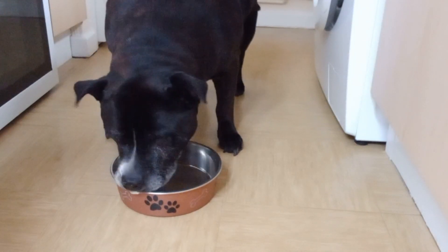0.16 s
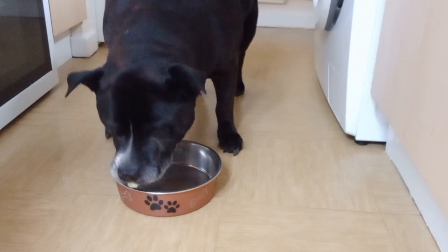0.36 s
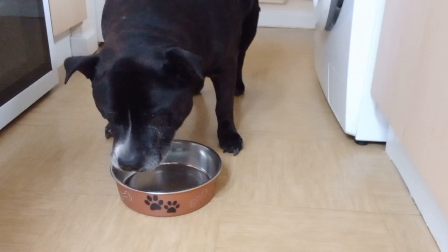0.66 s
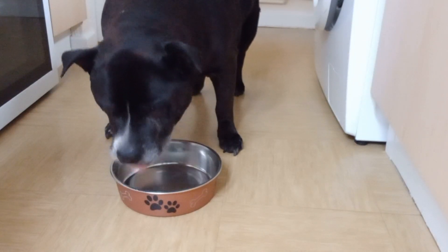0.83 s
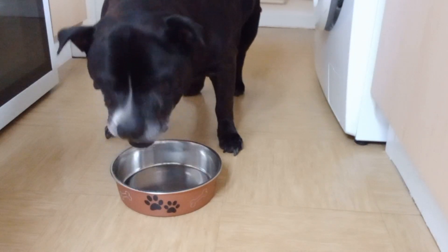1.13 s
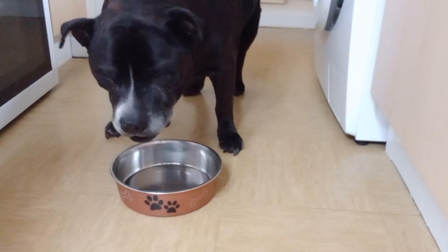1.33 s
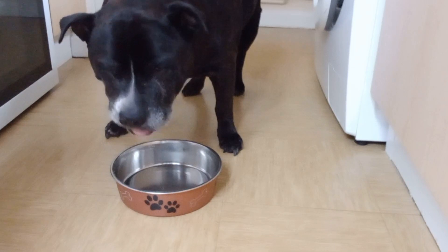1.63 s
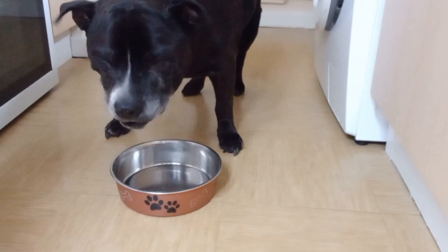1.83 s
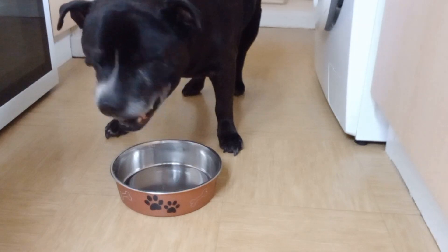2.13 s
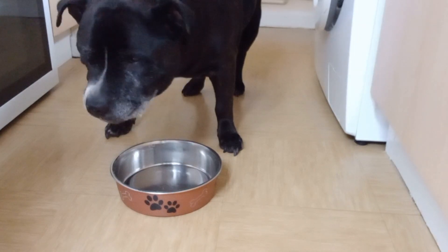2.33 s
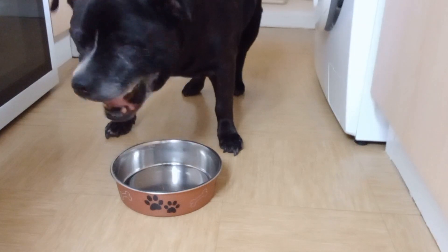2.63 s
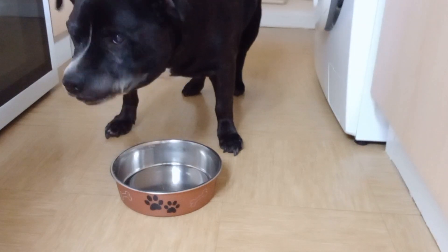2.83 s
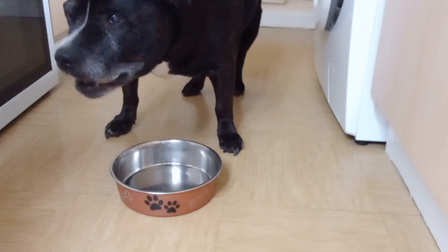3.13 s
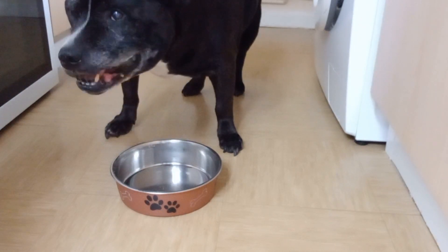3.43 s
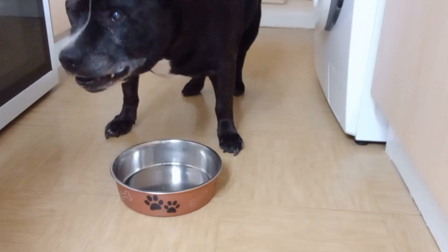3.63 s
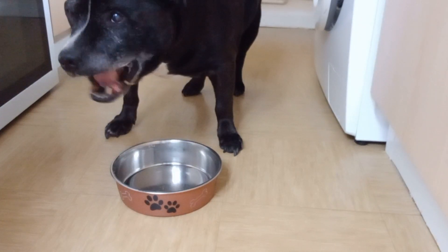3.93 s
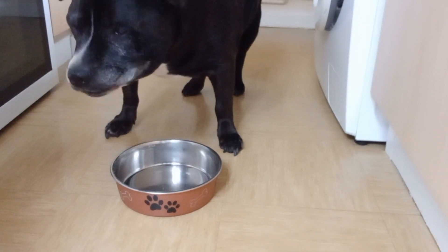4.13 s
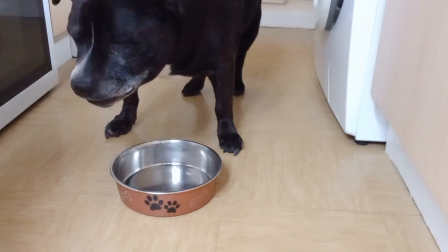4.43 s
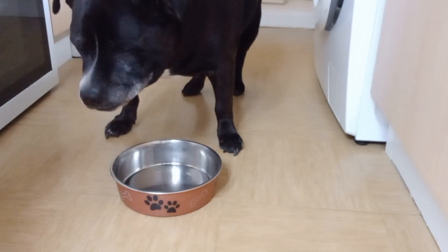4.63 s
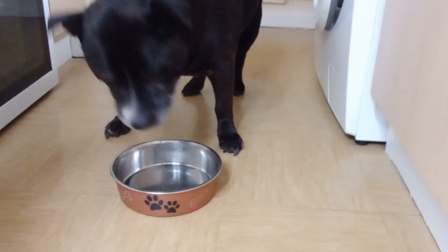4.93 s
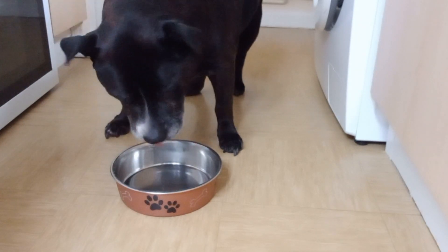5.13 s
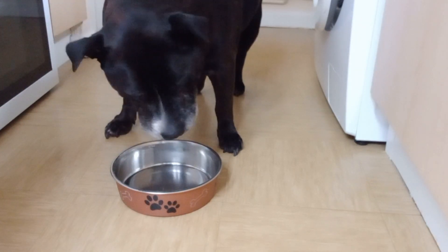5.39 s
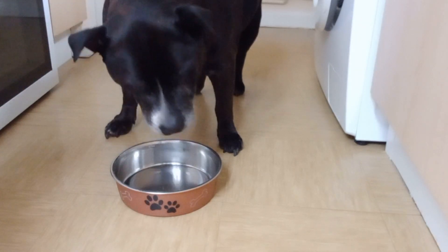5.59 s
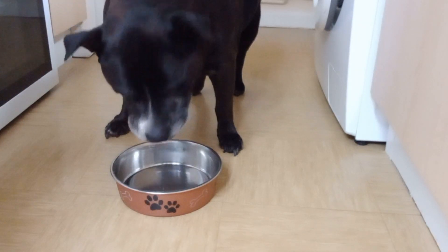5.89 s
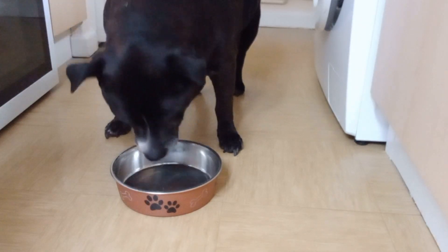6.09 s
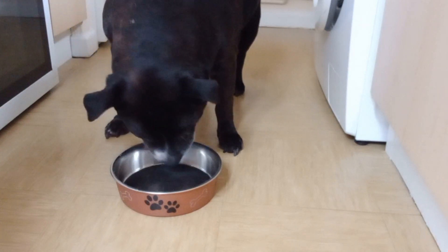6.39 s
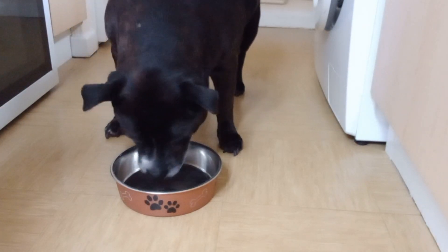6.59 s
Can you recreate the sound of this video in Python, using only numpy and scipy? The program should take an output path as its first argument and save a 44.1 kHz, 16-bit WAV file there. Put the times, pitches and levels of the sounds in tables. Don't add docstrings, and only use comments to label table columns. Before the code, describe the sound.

A dog licks and chews wetly over a metal bowl in a small hard kitchen, smacking irregularly, with a few dull floor thumps.

```python
import sys
import numpy as np
from scipy import signal
from scipy.fft import rfft, irfft
from scipy.io import wavfile
from scipy.ndimage import uniform_filter1d

SR = 44100
rng = np.random.default_rng(int(sys.argv[2]) if len(sys.argv) > 2 else 0)


def undo_db(level):
    steps = np.asarray(level, float) / 20
    return 10 ** steps


def wav_record(signal):
    frames = np.transpose(np.atleast_2d(signal))
    bounded = np.clip(frames, -1, 1)
    quanta = np.round(bounded * 32767).astype(np.int16)
    wavfile.write(sys.argv[1], SR, quanta)


N = 297675

# (time [s], peak [dB], cavity [Hz], ring [cycles])
TONGUE_SMACKS = [(0.536, -34.5, 630, 5), (0.583, -26, 740, 4.3), (0.887, -30.5, 676, 6.2),
                 (1.187, -28, 1150, 4.2), (1.86, -20, 1320, 3.8), (1.928, -22, 1340, 1.9),
                 (2.103, -24.5, 1210, 6), (2.147, -13, 1180, 1.06), (2.405, -29.5, 635, 2.9),
                 (2.622, -32, 1070, 4.3), (3.006, -24, 1160, 3.3), (3.025, -27.5, 1200, 4.5),
                 (3.425, -15, 1080, 2.5), (3.525, -26, 1250, 4.2), (3.617, -23.5, 1190, 10),
                 (3.633, -13, 930, 2.65), (3.735, -20.5, 900, 1.1), (3.854, -15.5, 1237, 1.3),
                 (3.878, -15, 1120, 1.1), (4.04, -22, 1080, 2), (4.063, -27.5, 772, 11),
                 (4.866, -13, 1170, 2.5), (5.285, -24.5, 1570, 11), (5.719, -19.5, 1042, 11.3),
                 (5.805, -41, 1150, 1.8), (5.893, -26, 685, 4.7), (6.146, -16.5, 1360, 2.5),
                 (6.207, -18.5, 1310, 1.1), (6.249, -13.5, 745, 1.84), (6.335, -22, 770, 1.1)]
# (time [s], peak [dB], cavity [Hz], ring [cycles])
MORE_SMACKS = [(2.502, -46, 1200, 2.3), (2.606, -27, 2000, 4), (2.639, -26.5, 1260, 2.8),
               (2.956, -31, 1090, 2), (2.98, -26.5, 985, 5), (3.115, -33, 984, 7.9), (3.21, -46, 910, 5.4),
               (3.228, -39, 1400, 3.2), (3.414, -26, 1080, 3.7), (3.441, -24, 1050, 3.4),
               (3.646, -26, 864, 2.7), (3.668, -25, 950, 2.8), (3.703, -18, 1170, 2.3),
               (3.707, -25.5, 2600, 5.5), (3.888, -40, 2080, 3.4), (3.946, -28, 1266, 5.1),
               (4.007, -22.5, 1170, 1.3), (4.097, -30, 890, 3.4), (4.085, -28.5, 2470, 4.6),
               (4.432, -31, 2650, 5.6), (4.455, -24, 1230, 3), (4.557, -32.5, 1120, 5.1),
               (4.853, -14.5, 2650, 3.4), (4.885, -24.5, 980, 6.9), (5.261, -39, 1700, 3.3),
               (5.308, -22, 1900, 4.7), (5.327, -19.5, 2150, 2.2), (5.731, -20, 1120, 6.4),
               (5.973, -23.5, 1800, 4.3), (6.103, -28, 1910, 4), (6.255, -19, 1120, 1.6),
               (6.308, -32, 744, 2.6), (1.736, -39.5, 1050, 3.9), (1.989, -39, 2300, 1.8),
               (2.196, -39, 1900, 2.5), (3.436, -20.5, 1170, 1.8), (3.451, -25, 1720, 3),
               (5.745, -23, 2000, 4), (3.522, -32, 3060, 4.5), (6.149, -29, 1500, 3), (2.161, -27, 2130, 2.5),
               (1.893, -24, 1280, 2.5), (1.962, -33, 2370, 4), (4.469, -24, 4350, 8), (1.662, -41, 4800, 8),
               (1.338, -42, 1900, 1.5)]
# (time [s], peak [dB], cavity [Hz])
LIP_SMACKS = [(1.187, -30, 2000), (1.339, -43, 1830), (1.708, -40, 2010), (1.824, -38, 1790),
              (1.861, -22, 1910), (1.929, -25, 2290), (2.065, -38, 2400), (2.147, -21, 1850),
              (2.256, -26.5, 2530), (2.406, -33, 2720), (2.999, -37.5, 2600), (3.115, -35.5, 1350),
              (3.428, -29, 2220), (3.525, -36, 2200), (3.6188, -25, 2340), (3.634, -41, 2440),
              (3.736, -32, 2100), (3.878, -26.5, 2170), (4.33, -36, 1480), (4.435, -33.5, 2770),
              (4.801, -34.5, 2180), (4.851, -25, 1710), (5.207, -40, 1500), (5.261, -49, 1658),
              (5.286, -21.5, 2180), (5.623, -27.5, 2130), (5.719, -23, 2250), (5.805, -30, 2160),
              (5.904, -30, 3020)]
LIP_CYCLES = 1.99
LEAD_S, LEAD_DB, LEAD_PITCH = 0.003993, -14.5, 1.071

# (full force from [s], held [s], squelch [dB], mouth cavity [Hz], fizz [dB rel])
CHEWS = [(0.0, 0.0037, -32.5, 1670, 0.5), (0.598, 0.0058, -43.5, 760, -2.5), (.28, 0.037, -50, 680, 1.5),
         (1.179, 0.09, -41.5, 1850, 0), (1.74, 0.042, -45.5, 1710, -17), (1.871, 0.065, -33, 1860, -1.5),
         (2.11, 0.046, -27, 1120, -28), (2.155, 0.024, -27.5, 1580, -5), (2.31, 0.19, -40.5, 1500, -5),
         (2.595, 0.039, -46, 1840, 3), (2.969, 0.085, -38, 1260, -5.5), (3.196, 0.045, -34.5, 1310, 0.5),
         (3.43, 0.014, -33, 1380, -27), (3.639, 0.15, -31, 1350, -5), (3.87, 0.12, -34.5, 1220, -6),
         (4.072, 0.025, -45.5, 1130, 9), (4.36, 0.089, -35, 1100, -6.5), (4.459, 0.01, -33.5, 1150, -19),
         (4.87, 0.084, -34.5, 1180, -8), (5.266, 0.0069, -29, 1780, -11), (5.64, 0.025, -39, 2040, 2),
         (5.73, 0.18, -33.5, 1230, -16), (5.95, 0.28, -43, 1500, 2), (6.74, .03, -52, 1710, -4)]
BITE_DB_PER_S, EASE_DB_PER_S, FIZZ_EASE_DB_PER_S = 303, 192, 133
REST_DB, REST_HZ, REST_FIZZ_DB = -72, 1500, -106
FRONT_HZ, FRONT_DB, DIP_HZ, DIP_SHARE = 2600, -20, 1850, 0.2
# (frequency [Hz], level [dB per Hz])
FIZZ_COLOUR = [(1470, -3), (2500, 6), (3410, 0.5), (4410, 1.5), (5070, 1), (7770, 2.5), (8200, -1),
               (9080, -29), (14600, -35), (16000, -36)]
SPLIT_HZ = 8850

# (time [s], peak [dB], colour [Hz], spray [dB rel])
THREAD_CRACKS = [(0.468, -38, 6860, -7.5), (2.687, -42.5, 8300, -2), (0.9472, -40.5, 7600, -8.5),
                 (1.1867, -27.5, 5350, -6.5), (1.338, -37, 8400, -10), (1.729, -33, 6560, 2),
                 (1.8612, -39, 3970, 0.5), (2.109, -30, 7200, -16), (2.135, -28.5, 4560, -13),
                 (2.2567, -26.5, 5600, -17), (2.996, -37, 4700, -13), (3.411, -39, 3320, -9),
                 (3.426, -29, 4800, -12), (3.52, -32.5, 2960, -5), (3.6166, -35, 3080, -8),
                 (3.7008, -31.5, 5460, -9), (3.8786, -26, 3500, -9), (3.964, -41.5, 8100, 7),
                 (4.323, -34, 7950, -12.5), (4.424, -30.5, 7400, -6), (4.446, -30, 4240, -6),
                 (4.828, -32.5, 4270, -9.5), (4.8527, -32, 3140, -13), (4.867, -28.5, 2800, -11),
                 (5.539, -43.5, 7750, -18), (5.6213, -28.5, 6500, -8), (5.7177, -33, 3400, -17),
                 (6.064, -28.5, 5900, -8), (6.146, -30.5, 3020, -24), (6.7148, -45, 7600, -10)]
# (time [s], peak [dB], colour [Hz])
FOOD_CRUNCHES = [(0.596, -42, 7550), (0.773, -41, 7540), (1.064, -42, 8500), (1.169, -27, 8200),
                 (1.621, -50, 7800), (2.0627, -38, 3150), (2.2902, -37, 5600), (2.4028, -31, 3330),
                 (2.452, -33, 4430), (2.5662, -29.5, 7000), (2.659, -41, 4600), (2.887, -37.5, 2730),
                 (3.192, -30, 5740), (3.631, -24.5, 9100), (4.001, -33.5, 3300), (4.466, -27, 4140),
                 (4.554, -36, 4400), (4.744, -36, 3920), (4.803, -33, 3100), (4.912, -35, 6360),
                 (5.121, -42.5, 5860), (5.202, -36, 6000), (5.247, -33, 6340), (5.282, -33, 3400),
                 (5.803, -31, 3820), (5.852, -34, 3740), (5.959, -26.5, 3280), (5.961, -31.5, 6000),
                 (6.01, -33.5, 3470), (6.163, -28, 2920), (6.483, -60, 4500)]
# (time [s], peak [dB], colour [Hz])
LIP_TICKS = [(1.0214, -34.5, 7960), (1.1532, -35, 8300), (1.6834, -57, 4530), (1.703, -29.5, 8140),
             (1.738, -35, 7200), (1.987, -37, 3840), (2.195, -37, 7100), (2.4107, -39, 3030),
             (2.591, -22, 4570), (2.606, -24.5, 5480), (2.627, -28, 3060), (2.9693, -36, 3530),
             (3.679, -36, 5610), (3.764, -26, 3200), (3.8925, -19.5, 7200), (3.911, -28, 3080),
             (3.93, -27, 7760), (4.1167, -24.5, 5000), (4.4725, -36, 4570), (4.6002, -28.5, 4740),
             (4.9694, -28.5, 3030), (5.9438, -29, 3450), (6.0127, -33, 3080), (6.0743, -25.5, 7100),
             (6.2078, -30, 3120), (6.2463, -29, 3930), (6.736, -37, 5180), (1.045, -45, 3000),
             (1.093, -36.5, 3600), (1.855, -39, 6300), (2.066, -34, 6000), (3.424, -22.5, 7000),
             (3.437, -25, 5000), (3.496, -45, 3000), (3.559, -36, 3800), (3.527, -40, 6500),
             (5.245, -23, 4420), (5.263, -28, 3200), (6.014, -22.5, 5300), (6.068, -26, 3350),
             (6.53, -60, 7600), (6.386, -38, 6500), (6.335, -28, 3370), (5.648, -30, 4000)]
CRUNCH_SPRAY_DB, CRUNCH_WIDE = -26, 0.7
TICK_SPRAY_DB, TICK_WIDE = -24, 0.48
SNAP_S, SNAP_PEAK = 0.0006, 6.65
SPLASH_S, SPLASH_DB = 0.006, -10.5
SPRAY_S = 0.0021
TINT_WIDTH, TINT = 0.22, 1.05

# (time [s], length [s], level [dB], first pitch [Hz], last pitch [Hz])
SLURPED_AIR = [(0.214, 0.35, -66.5, 3600, 3000), (0.236, 0.18, -58, 1500, 1170),
               (0.245, 0.15, -63, 3020, 3000), (0.7, 0.063, -65, 2880, 2800),
               (0.875, 0.073, -59, 1900, 2000), (0.948, 0.086, -65, 2290, 2450),
               (1.048, 0.064, -61, 1500, 1380), (5.897, 0.092, -53, 2970, 3400),
               (1.2, 0.068, -67, 1566, 1500), (1.643, 0.024, -49.5, 4770, 5100),
               (1.713, 0.096, -54.5, 2370, 2300), (1.722, 0.042, -51, 690, 1274),
               (2.36, 0.1, -53.5, 2940, 2800), (2.494, 0.12, -46.5, 1000, 2300),
               (2.584, 0.052, -46.5, 4450, 2840), (2.78, 0.091, -55, 6130, 5200),
               (2.796, 0.13, -54, 1130, 1430), (2.804, 0.049, -53.5, 2750, 2400),
               (2.83, 0.1, -58, 4130, 4200), (3.009, 0.04, -43, 2280, 2120),
               (3.176, 0.098, -41.5, 2720, 2480), (3.304, 0.0092, -48, 620, 627),
               (3.404, 0.042, -38, 1070, 1070), (3.991, 0.25, -49, 945, 580),
               (4.09, 0.063, -54.5, 2640, 2500), (4.442, 0.061, -39, 4300, 4400),
               (4.533, 0.19, -58.5, 4470, 4400), (5.62, 0.027, -49, 2750, 2800),
               (1.86, 0.06, -56, 4300, 4200), (1.94, 0.068, -48, 3740, 3640),
               (4.548, 0.041, -50.5, 950, 1090), (4.7, 0.099, -53.5, 1200, 1760),
               (4.971, 0.048, -48, 5600, 5400), (5.521, 0.053, -62, 2590, 2600),
               (5.857, 0.06, -49, 3600, 3800), (6.098, 0.043, -48, 1340, 1300),
               (6.264, 0.12, -43.5, 1280, 840), (6.317, 0.086, -53.5, 3420, 3600),
               (6.477, 0.065, -62.5, 2140, 2190), (6.735, 0.042, -39, 5400, 6000)]
SLURP_WIDTH = 0.16
# (time [s], length [s], level [dB], pitch [Hz])
THROAT_GULPS = [(0, 0.059, -45, 696), (0.286, 0.096, -61.5, 594), (1.016, 0.067, -61, 423),
                (2.133, 0.048, -51.5, 403), (2.357, 0.15, -52, 447), (2.877, 0.021, -50, 700),
                (3.038, 0.054, -58, 290), (3.236, 0.091, -49, 686), (3.629, 0.091, -58.5, 199),
                (3.77, 0.09, -47, 387), (4.101, 0.051, -53, 583), (4.603, 0.19, -68, 226),
                (4.85, 0.042, -54, 423), (4.931, 0.1, -46.5, 427), (5.618, 0.058, -59, 470),
                (5.625, 0.04, -46, 710), (5.834, 0.39, -51.5, 380), (6.01, 0.097, -50.5, 637)]
GULP_SAG, GULP_WIDTH_HZ = 0.79, 118
# (time [s], length [s], level [dB], first pitch [Hz], last pitch [Hz])
MOUTH_HUMS = [
    (0.132, 0.046, -52.5, 730, 690),
    (0.466, 0.11, -50.5, 616, 626),
    (0.591, 0.1, -52, 816, 800),
    (0.69, 0.042, -64, 815, 820),
    (0.879, 0.059, -50.5, 700, 680),
    (1.954, 0.14, -45.5, 617, 670),
    (3.577, 0.035, -49, 1160, 1270),
    (5.392, 0.034, -49.5, 706, 673),
    (5.721, 0.078, -46.5, 1110, 1095),
]
HUM_WIDTH_HZ = 35

# (time [s], peak [dB], lowest board [dB rel], higher boards [dB rel])
FLOOR_THUMPS = [(1.315, -33.5, 7, -15), (2.14, -44.5, -3, 4), (2.407, -39, -3, -17), (3.054, -38, 0.5, -8),
                (3.244, -26.5, -5, -17), (3.296, -33, -3, -5), (3.424, -40.5, 12, -6),
                (3.787, -9.5, -14, -17), (3.817, -10.5, -12, -9), (3.834, -15, -10, 0.5),
                (3.862, -20.5, 9, -15), (3.889, -16.5, 1, -8.5), (4.088, -22.5, -8, -21),
                (4.12, -28, 7.5, -3.5), (4.943, -13.5, -2, -17), (4.964, -19.5, 10, -4),
                (5.886, -35.5, -3, -3.5), (6.119, -30, -3, -8), (6.157, -26.5, -3, -9.5),
                (6.337, -15, -7, -15.5), (6.718, -30.5, -3, -7)]
# (pitch [Hz], level [dB], time to fall 60 dB [s])
FLOOR_BOARDS = [
    (91, -0.5, 0.16),
    (136, 7.5, 0.2),
    (169.7, 10, 0.17),
    (205, 12.5, 0.15),
]
HIGH_BOARDS_DB, HIGH_LAG_S = -2, 0.00073
HOLD_S, SHUT_DB = 0.139, -5.5

# (frequency [Hz], time to fall 60 dB [s])
ROOM_DECAY = [(300, 0.41), (1000, 0.35), (3000, 0.43), (8000, 0.39), (15000, 0.5)]
# (delay [ms], left level [dB], right level [dB])
EARLY_ECHOES = [
    (3.683, -2, -62),
    (11.775, -17.5, -3),
    (21.966, -5.5, -14),
]
# (time [s], left-right difference [dB])
HEAD_SWING = [
    (0.0, 2.5),
    (5.45, 2),
    (6.75, 1.5),
]
# (frequency [Hz], level [dB per Hz])
HUSH_COLOUR = [(15, -41), (25, -39), (38, -14), (72, 4), (123, 7), (394, -2.5), (818, -5.5), (1100, -11.5),
               (1330, -8.5), (1560, -11), (3520, -12.5), (7710, -7), (9320, -25.5), (14800, -18),
               (16000, -13.5)]
HUSH_DB = -51.5


def evened(x):
    return x / np.sqrt(np.mean(x ** 2) + 1e-20)


def read(points, hz):
    f, value = np.transpose(points)
    return np.interp(np.log(hz + 1), np.log(f + 1), value)


def colour(x, gain):
    size = x.shape[-1]
    return irfft(rfft(x) * gain(np.fft.rfftfreq(size, 1 / SR)), size)


def resonate(x, hz, width):
    turn = np.exp(2j * np.pi * np.cumsum(hz * np.ones(x.shape[-1])) / SR)
    r = np.exp(-np.pi * width / SR)
    smooth = signal.lfilter([1 - r], [1, -r], x / turn + 1e-18)
    return 2 * (turn * smooth).real


def gate(t):
    return undo_db(SHUT_DB * np.clip((t - HOLD_S) / 0.0021, 0, 1))


def wet_bands(x):
    x = colour(x, lambda hz: undo_db(read(FIZZ_COLOUR, hz)) / (1 + (2600 / (hz + 1)) ** 6))
    low = colour(x, lambda hz: 1 / (1 + (hz / SPLIT_HZ) ** 30))
    return evened(low), evened(x - low)


def ring(t, hz, cycles):
    u = t * hz / cycles * 2.28
    return np.sin(2 * np.pi * hz * t) * u * np.exp(1 - u)


def smacks():
    out, t = np.zeros(N + 2000), np.arange(2000) / SR
    lips = [(s, db + 11.5, hz, LIP_CYCLES) for s, db, hz in LIP_SMACKS]
    for s, db, hz, cycles in TONGUE_SMACKS + MORE_SMACKS + lips:
        pop = ring(t, hz, np.clip(cycles, 1.3, 9))
        lead = ring(t, hz * LEAD_PITCH, 3.4)
        out[round(s * SR):][:len(t)] += undo_db(db - 8.5) * pop
        out[round((s - LEAD_S) * SR):][:len(t)] += undo_db(db - 9.5 + LEAD_DB) * lead
    return out[:N]


def jaw():
    t = np.arange(0, N / SR, 1 / 1000)
    s, held, db, hz, fizz_db = np.transpose(CHEWS)[..., None]
    built_db = db - BITE_DB_PER_S * np.maximum(s - t, 0)
    after = np.maximum(t - s - held, 0)
    power = undo_db(built_db - EASE_DB_PER_S * after) ** 2
    fizz = undo_db(built_db + fizz_db - FIZZ_EASE_DB_PER_S * after) ** 2
    rest = undo_db(REST_DB) ** 2
    total = power.sum(0) + rest
    force = total ** 0.5
    mouth_hz = ((power * hz).sum(0) + rest * REST_HZ) / total
    wetness = (fizz.sum(0) + undo_db(REST_FIZZ_DB) ** 2) ** 0.5
    return [np.interp(np.arange(N) / SR, t, c) for c in (force, mouth_hz, wetness)]


def chewing():
    force, mouth_hz, wetness = jaw()
    sizes = undo_db(3 * np.minimum(rng.exponential(1, N), 3))
    bursts = rng.random(N) < 2500 / SR
    bubbles = rng.standard_normal(N) * sizes * bursts
    clumps = undo_db(4 * evened(uniform_filter1d(rng.standard_normal(N), size=350)))
    drive = clumps * (evened(bubbles) + 0.97 * rng.standard_normal(N))
    cavity = evened(resonate(resonate(drive, mouth_hz, 480), mouth_hz, 580))
    cheeks = evened(colour(drive, lambda hz: 1 / (1 + (600 / (hz + 1)) ** 4) / (1 + (hz / 3000) ** 4)))
    cheeks = cheeks - DIP_SHARE * resonate(cheeks, DIP_HZ, 300)
    front = evened(resonate(resonate(drive, FRONT_HZ, 600), FRONT_HZ, 780))
    squelch = evened(cavity + 1.8 * cheeks + undo_db(FRONT_DB) * front)
    fizz, spray = wet_bands(drive)
    return undo_db(-14.5) * (force * squelch + wetness * (fizz + undo_db(-11.0) * spray))


def cracks():
    out, t = np.zeros(N + 2000), np.arange(2000) / SR
    noise = rng.standard_normal(N + 2000)
    for s, *_ in THREAD_CRACKS + FOOD_CRUNCHES + LIP_TICKS:
        noise[round((s + 2 * SNAP_S) * SR)] = SNAP_PEAK
    crack, spray = wet_bands(noise)
    mist = np.exp(-t / SPRAY_S) * (t / SPRAY_S) ** 2
    snap = np.exp(-t / SNAP_S) * (t / SNAP_S) ** 2
    burst = snap + undo_db(SPLASH_DB) * np.exp(-t / SPLASH_S)
    threads = [(*row, 1) for row in THREAD_CRACKS]
    crunches = [(*row, CRUNCH_SPRAY_DB, CRUNCH_WIDE) for row in FOOD_CRUNCHES]
    ticks = [(s, db - 7.5, hz, TICK_SPRAY_DB, TICK_WIDE) for s, db, hz in LIP_TICKS]
    for s, db, hz, spray_db, wide in threads + crunches + ticks:
        at = slice(round(s * SR), round(s * SR) + len(t))
        tinted = evened(resonate(crack[at], hz, TINT_WIDTH * hz))
        body = burst * (wide * crack[at] + TINT * tinted)
        out[at] += undo_db(db - 7.0) * (body + undo_db(spray_db + 7.0) * mist * spray[at])
    return out[:N]


def slurps():
    out = np.zeros(N + SR)
    flutter = evened(uniform_filter1d(rng.standard_normal(N + SR), size=400))
    air = rng.standard_normal(N + SR) * undo_db(3.65 * flutter)
    sag = GULP_SAG ** 0.5
    gulps = [(*row, hz / sag, hz * sag, GULP_WIDTH_HZ) for *row, hz in THROAT_GULPS]
    hums = [(*row, HUM_WIDTH_HZ) for row in MOUTH_HUMS]
    gaps = [(*row, SLURP_WIDTH * row[-1]) for row in SLURPED_AIR]
    for s, length, db, first_hz, last_hz, width in gulps + hums + gaps:
        at = slice(round(s * SR), round((s + length) * SR))
        hz = np.geomspace(first_hz, last_hz, at.stop - at.start)
        whistle = evened(resonate(resonate(air[at], hz, width), hz, 13.3 * width))
        out[at] += undo_db(db - 5.0) * whistle * signal.windows.tukey(len(hz), 0.3)
    return out[:N]


def thumps():
    out, t = np.zeros((2, N + SR)), np.arange(SR // 2) / SR
    rings = [undo_db(db - 60 * t / t60) * np.sin(2 * np.pi * hz * t) for hz, db, t60 in FLOOR_BOARDS]
    soft = (1 - np.exp(-t / 0.0078)) ** 2 * gate(t) ** 2.0
    for s, db, lowest_db, higher_db in FLOOR_THUMPS:
        low_boards = undo_db(lowest_db) * rings[0] + rings[1]
        high_boards = undo_db(higher_db + 2.0) * sum(rings[2:])
        out[:, round(s * SR):][:, :len(t)] += undo_db(db - 11.5) * soft * np.array([low_boards, high_boards])
    low, high = out[:, :N]
    late = np.roll(high, round(HIGH_LAG_S * SR))
    left = 1.08 * low + undo_db(HIGH_BOARDS_DB) * late
    right = 0.92 * np.roll(low, 8) + high
    return np.array([left, right])


def kitchen(x, tail_db=6.5):
    taps = np.zeros((3, 2, SR // 2))
    at = np.arange(300, SR // 2 - 20, 20) + rng.integers(0, 20, (3, 2, (SR // 2 - 301) // 20))
    np.put_along_axis(taps, at, rng.choice([-1., 1.], at.shape), 2)
    hz, t, z = signal.stft(taps, SR, nperseg=256)
    decay = undo_db(-60 * t / read(ROOM_DECAY, hz)[:, None])
    tail = signal.istft(z * decay, SR, nperseg=256)[1]
    tail *= gate(np.arange(tail.shape[2]) / SR)
    tail *= undo_db(tail_db) / np.linalg.norm(tail[0, 0])
    tail[:, [0, 1], [3, 0]] += undo_db([1.5, -3])
    for k, (ms, *db) in enumerate(EARLY_ECHOES):
        delay = round(ms * SR / 1000) + rng.integers(0, 12, 2)
        tail[:, [0, 1], delay] += (-1) ** k * undo_db(db)
    turn = 2 * np.pi * (1.7 * np.arange(N) / SR + np.arange(3)[:, None] / 3)
    shares = np.sqrt(2 / 3) * np.cos(turn / 2) ** 2 * 4 / 3
    return signal.fftconvolve((x * shares)[:, None], tail, axes=2).sum(0)[:, :N]


def hush():
    a, b = rng.standard_normal((2, N))
    shared = colour(a - b, lambda hz: 1 / (1 + (hz / 250) ** 2))
    pair = np.array([a, b + 0.85 * shared])
    drift = undo_db(2.2 * evened(uniform_filter1d(rng.standard_normal(N), size=5000)))
    air = undo_db(HUSH_DB - 1.0) * evened(colour(pair, lambda hz: undo_db(read(HUSH_COLOUR, hz))))
    rumble = colour(air, lambda hz: 1 / (1 + (hz / 260) ** 4))
    return undo_db(0.5) * rumble + drift * (air - rumble)


def scene():
    mouth = smacks() + cracks() + chewing() + slurps()
    lean_db = np.interp(np.arange(N) / SR, *np.transpose(HEAD_SWING)) - 1.2
    sides = undo_db(np.array([lean_db, -lean_db]) / 2)
    return kitchen(mouth) * sides + thumps() + hush()


def low_pass(x):
    return signal.sosfilt(signal.butter(12, 15900, fs=SR, output="sos"), x)


def record(dry):
    mix = colour(dry, lambda hz: 1 / (1 + (hz / 15800) ** 200) / (1 + (45 / (hz + 1)) ** 3))
    return low_pass(mix)


dry = scene()
out = record(dry)
wav_record(out)
```